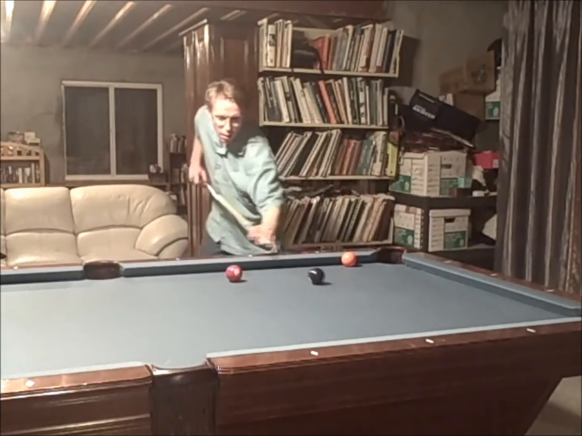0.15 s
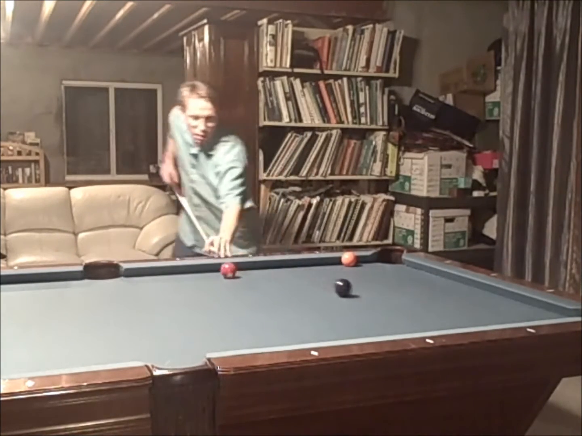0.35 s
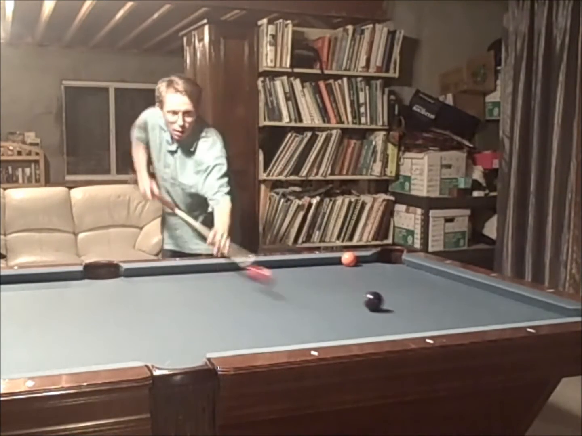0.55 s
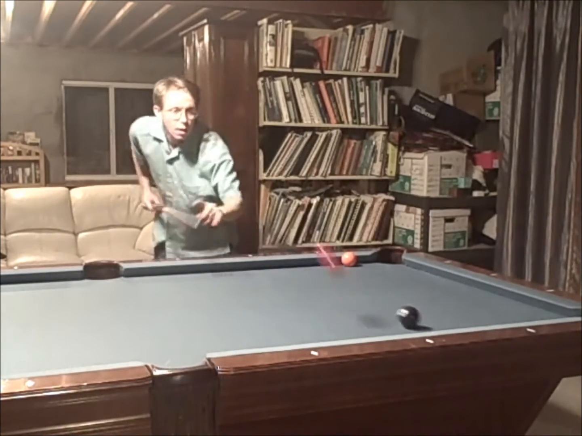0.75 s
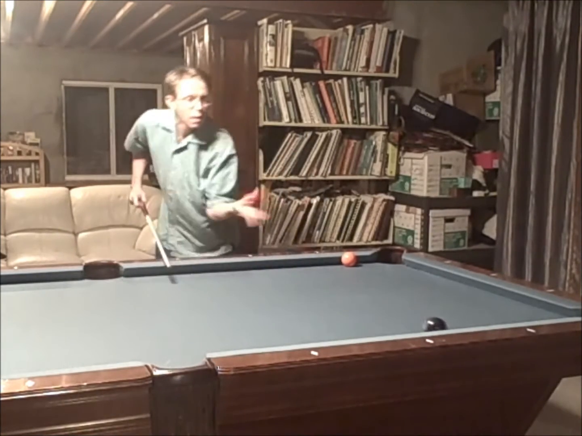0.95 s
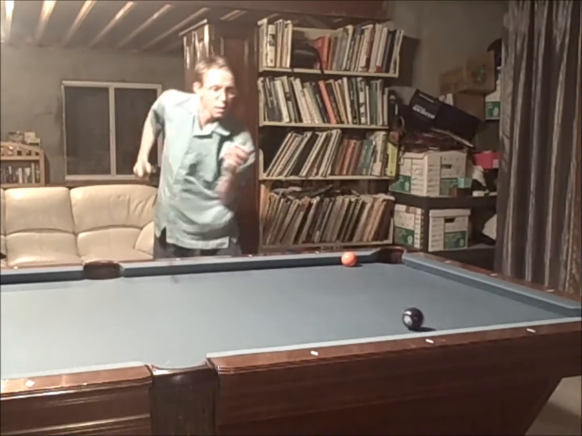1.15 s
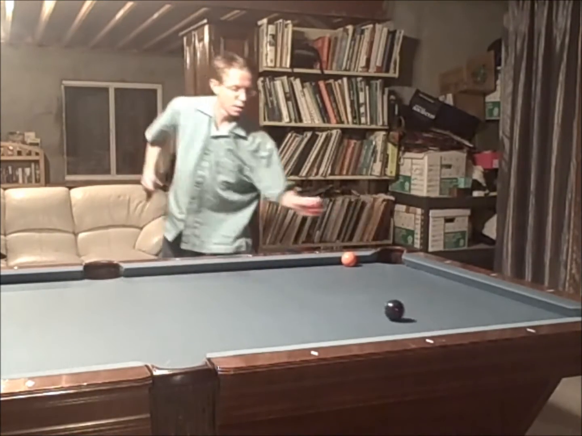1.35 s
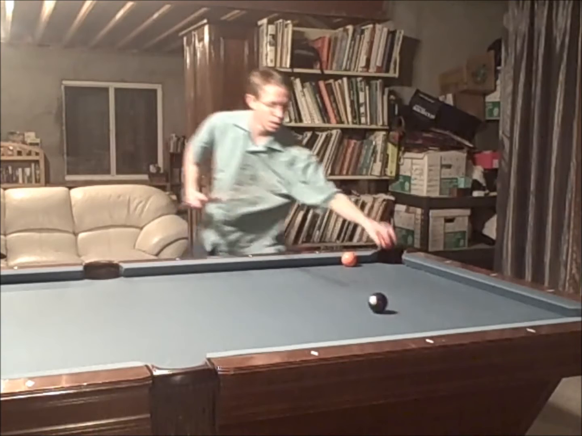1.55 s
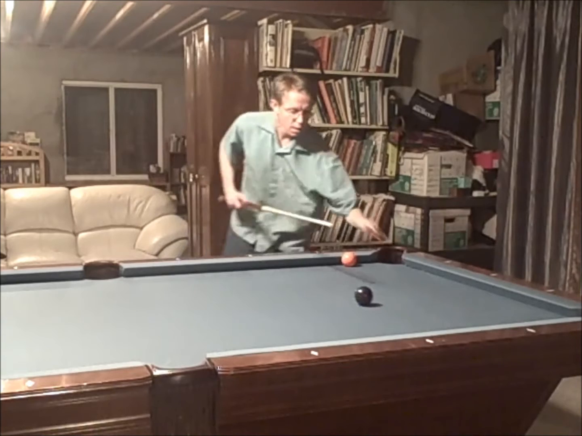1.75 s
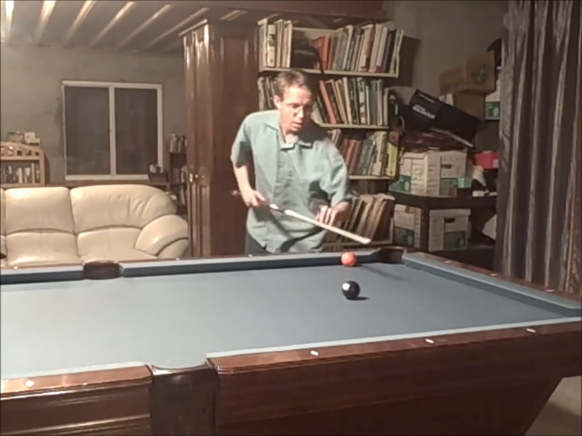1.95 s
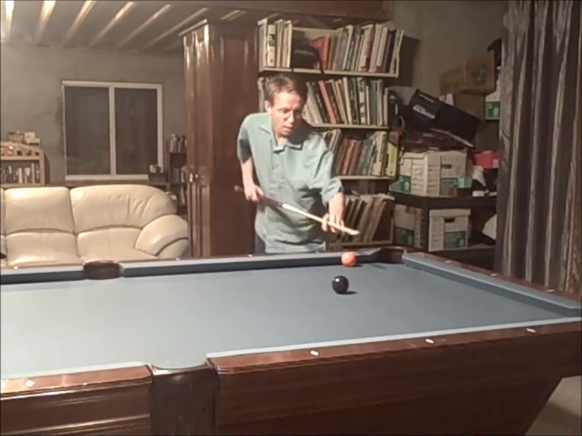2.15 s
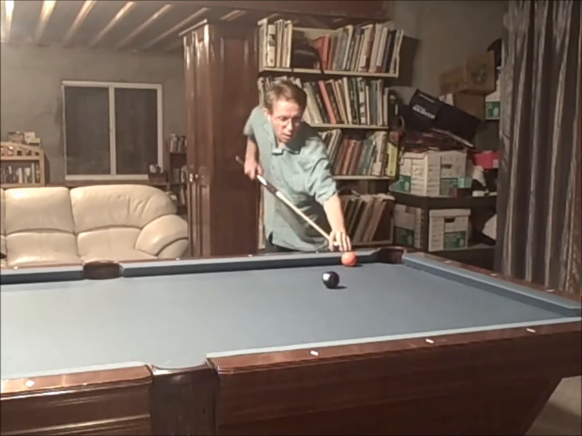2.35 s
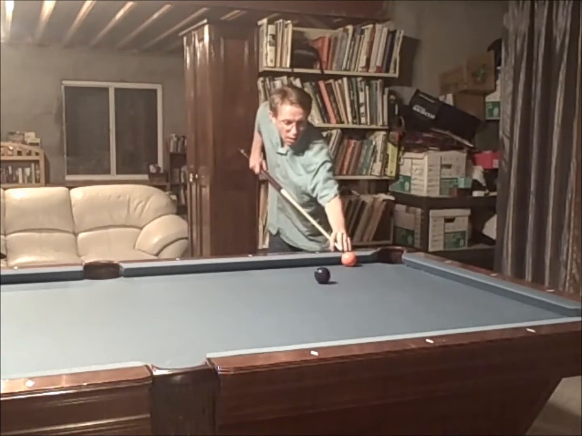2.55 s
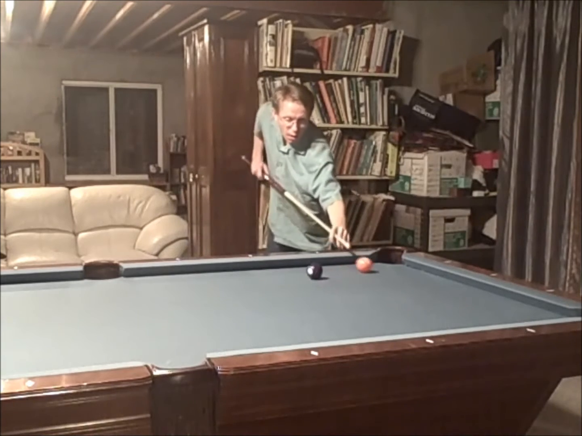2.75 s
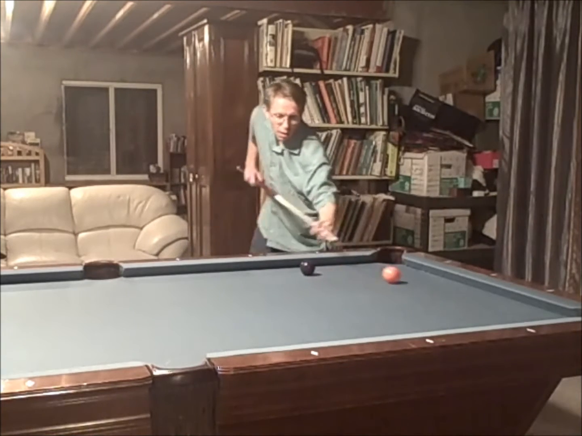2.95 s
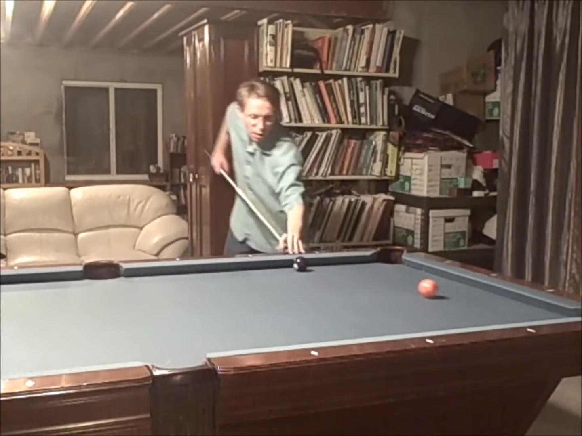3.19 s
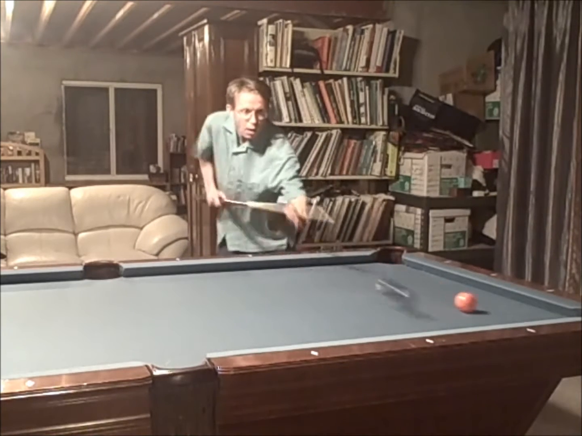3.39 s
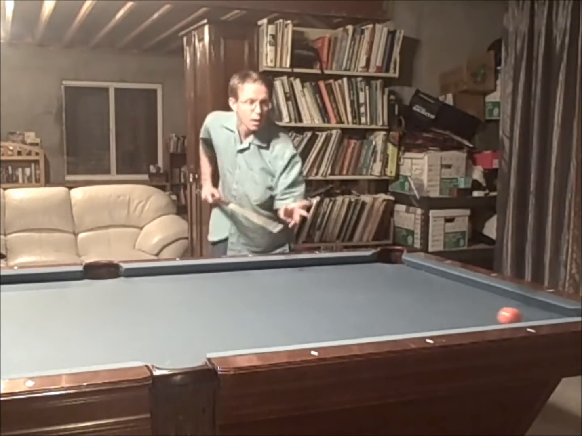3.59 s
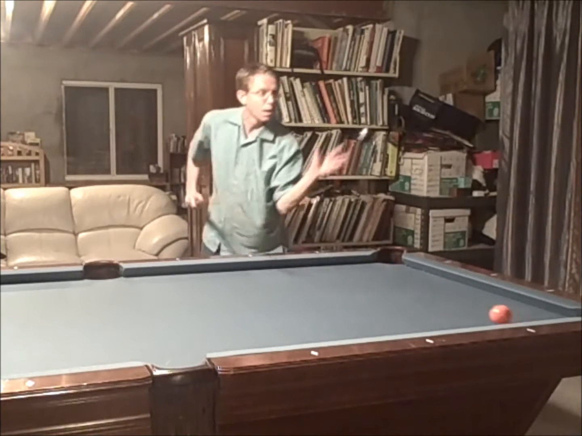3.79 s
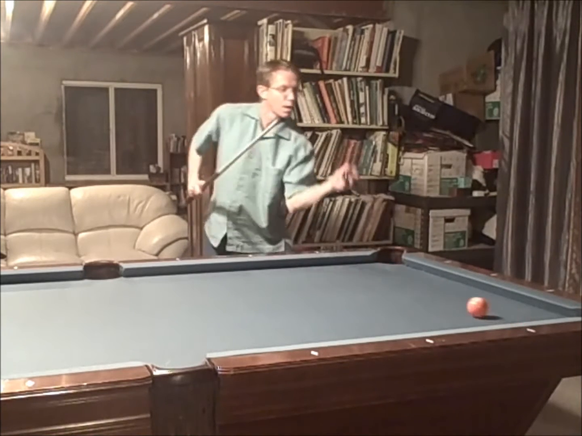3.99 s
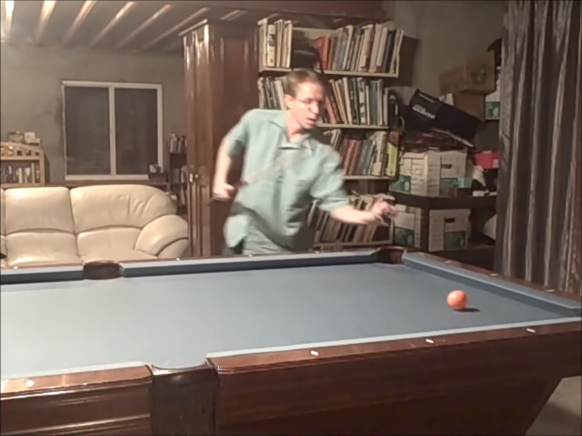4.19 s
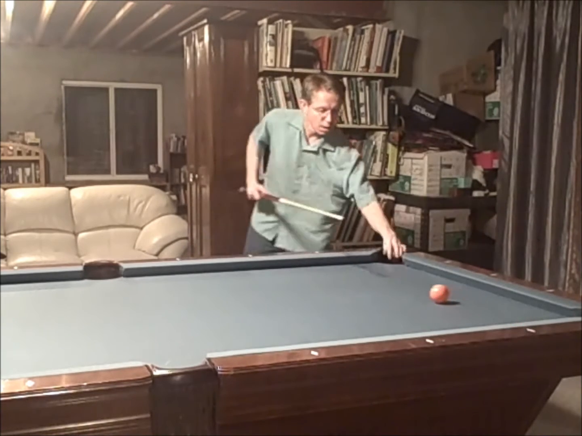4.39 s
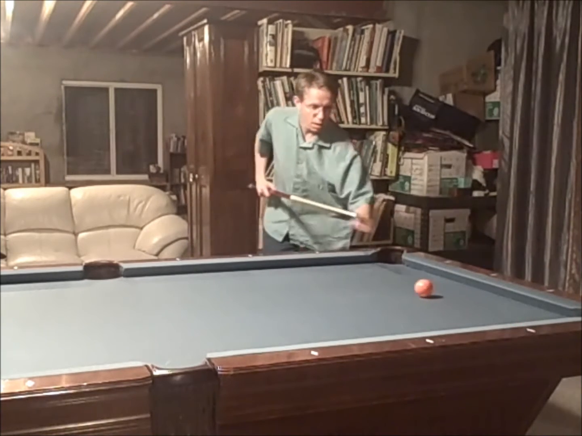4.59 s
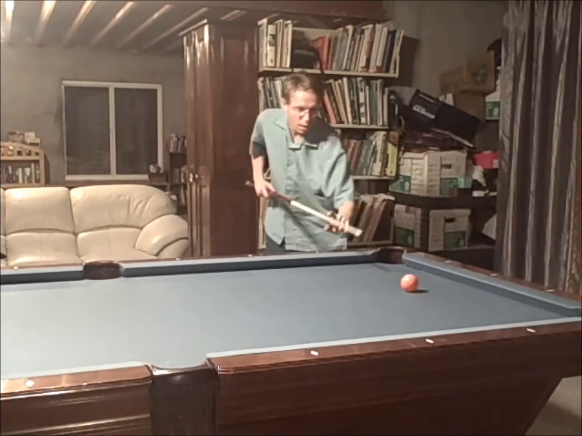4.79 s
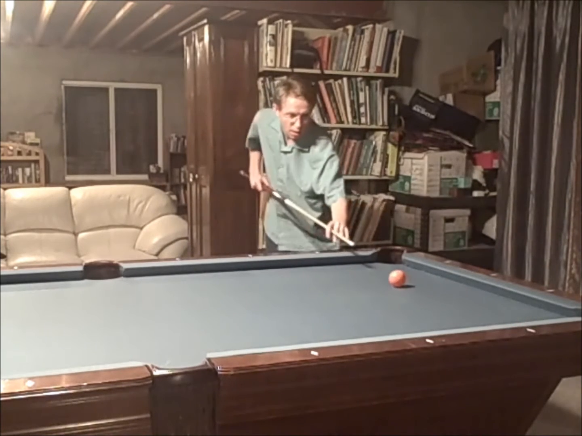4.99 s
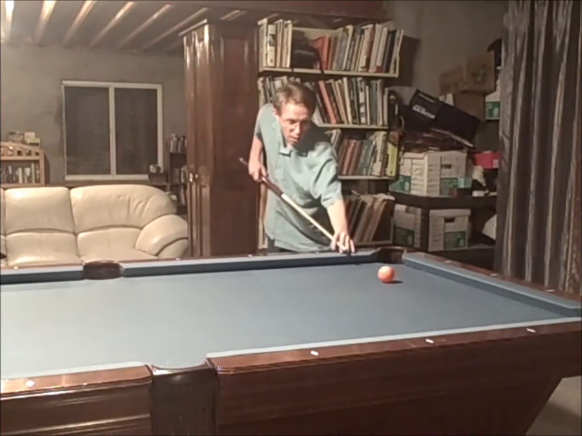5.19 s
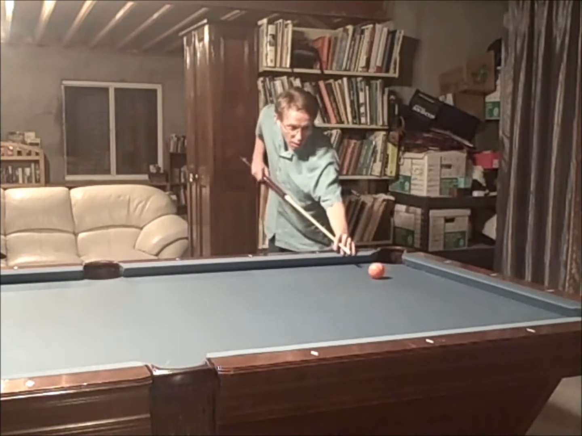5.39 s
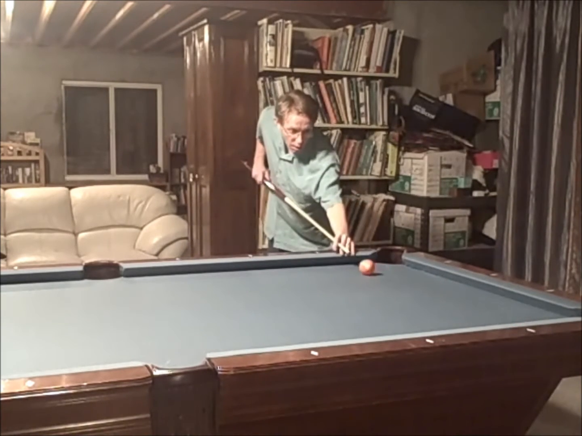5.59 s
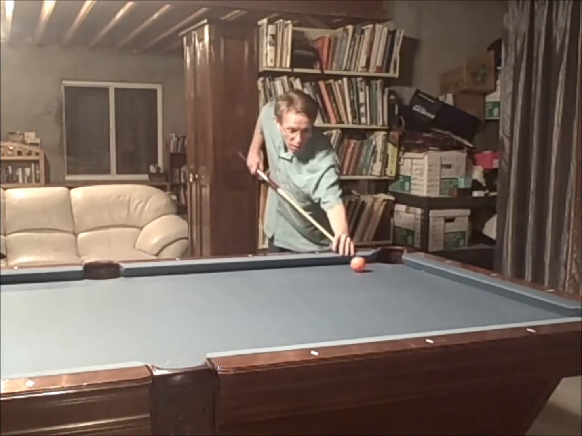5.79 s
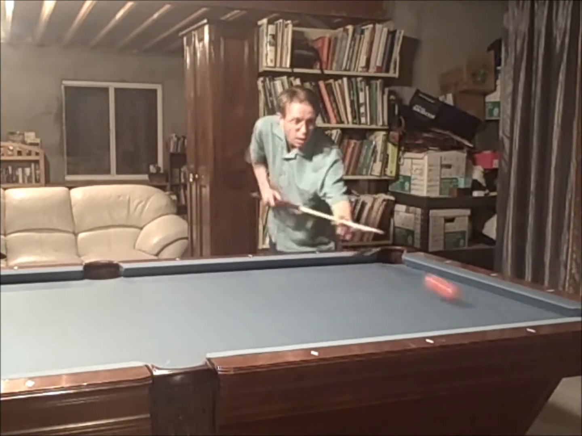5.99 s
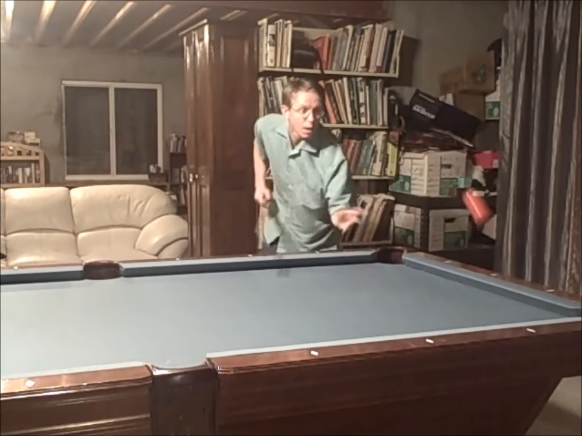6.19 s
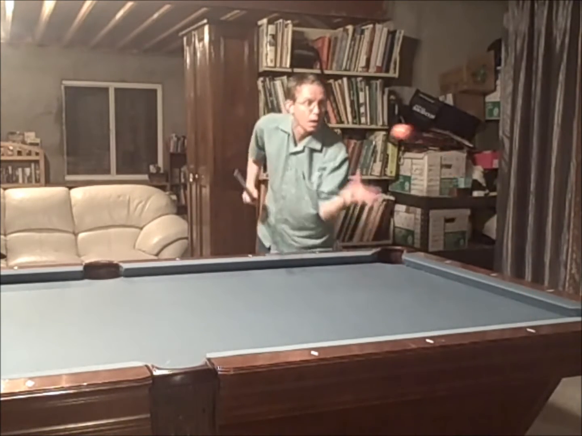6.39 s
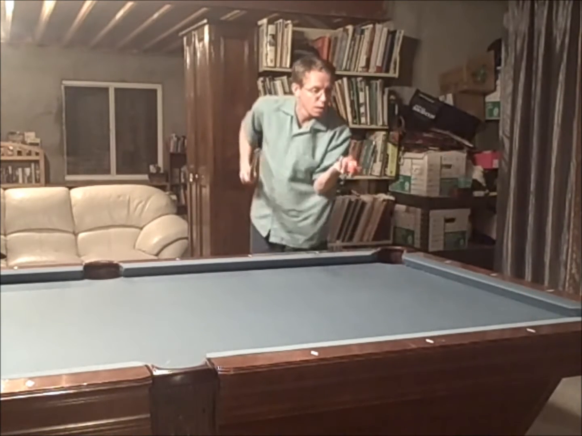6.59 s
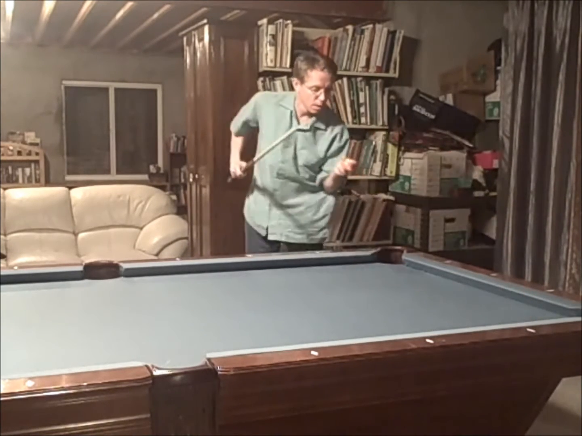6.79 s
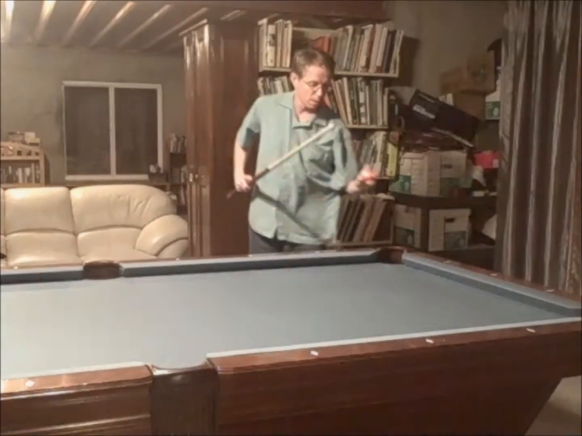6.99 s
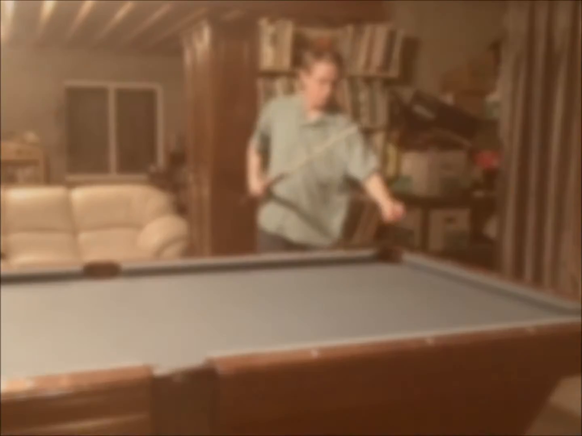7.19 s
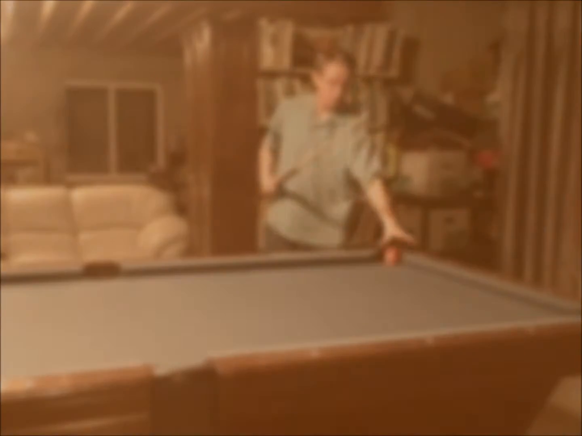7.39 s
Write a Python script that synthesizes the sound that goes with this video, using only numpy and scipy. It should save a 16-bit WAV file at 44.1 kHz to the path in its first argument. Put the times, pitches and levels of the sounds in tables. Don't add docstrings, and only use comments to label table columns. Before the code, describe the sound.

Three hard downward cue strikes crack loudly, each followed by a dull rail thud and hand catch; two pool balls clatter into a pocket.

```python
import sys
import numpy as np
from scipy import signal
from scipy.fft import rfft, irfft
from scipy.io import wavfile
from scipy.ndimage import uniform_filter1d

SR = 44100
rng = np.random.default_rng(int(sys.argv[2]) if len(sys.argv) > 2 else 0)


def magnitude_from_level(level_db):
    exponent = np.asarray(level_db, float) / 20
    return 10 ** exponent


def unload_audio(sound):
    columns = np.transpose(np.atleast_2d(sound))
    steps = np.round(np.clip(columns, -1, 1) * 32767)
    wavfile.write(sys.argv[1], SR, steps.astype(np.int16))


N = 328545

# start in seconds, level in dB, time for the rattle to fall 60 dB in seconds.
RAIL_HITS = [
    (0.839, -17.5, .15),
    (3.6079, -16.5, 0.16),
    (6.189, -18, 0.14),
]
# pitch in Hz, width in Hz, lift in dB.
FRAME_RINGS = [(172.8, 24, 8), (276.5, 10, 5.5), (409.4, 26, 4), (607, 60, 5), (732, 45, 1), (887, 28, 0.5)]
STROKE_RISE, SMALL_RISE = 0.025, 0.052


def jumps():
    # start in seconds, level in dB, rattle's 60 dB fall in seconds, rise as a share of that fall.
    strokes = [
        (.673, -7, .1, .012),
        (3.4237, -9, .06, .05),
        (6.032, -9.5, .062, .025),
    ]
    # frequency in Hz, level in dB.
    colours = [
        [(35, -73), (60, -40), (160, -10), (408, -3.5), (553, -5), (621, -1), (1170, -2.5), (1340, -6.5),
         (1510, -5.5), (2410, -7), (3670, -23), (4030, -21), (8710, -30), (12100, -29.5), (16000, -38.5)],
        [(12, -48.5), (20, -29.5), (70, -28), (262, -2), (499, -9), (590, -2), (678, -5.5), (897, 1),
         (2600, -9.5), (5850, -27.5), (6360, -22), (7310, -34), (7950, -27.5), (12100, -31), (16000, -36)],
        [(35, -52.5), (60, -29.5), (308, -6.5), (458, -12), (767, -3), (1090, -7), (1580, -9), (3420, -21.5),
         (4030, -24), (4970, -31.5), (5460, -26.5), (5860, -34), (11300, -34), (14200, -36), (16000, -41.5)],
    ]
    # pitch in Hz, width in Hz, lift in dB.
    shaft_rings = [(936.4, 23, 3.5), (1240, 44, 2.5), (1610, 50, 6.5)]
    # pitch in Hz, width in Hz.
    high_rings = [(4150, 87), (5450, 210), (6480, 110), (8200, 130), (9350, 120), (11200, 200),
                  (12000, 300), (13050, 200)]
    high_lifts = [
        [5, 7, 8, 9, 7, 4, 13, 6],
        [6, 9, 8, 10, 8, 5, 12, 8],
        [6, 7, 7, 10, 8, 9, 11, 6],
    ]
    contact_db, room_db = -22, -3.5
    out = np.zeros(N)
    for (start, db, t60, rise), colour, lifts in zip(strokes, colours, high_lifts):
        bright = [(hz, width, lift) for (hz, width), lift in zip(high_rings, lifts)]
        row = (start, db, t60, contact_db, room_db)
        add(out, start, hit(row, colour, FRAME_RINGS + shaft_rings + bright, rise))
    return out


def thump():
    jolt = (3.426, -36, 40, .05)
    start, db, hz, t60 = jolt
    t = np.arange(SR // 2) / SR
    out = np.zeros(N)
    add(out, start, magnitude_from_level(db - 60 * t / t60) * np.sin(2 * np.pi * hz * t))
    return out


def rail_thuds():
    # frequency in Hz, level in dB.
    colours = [
        [(59, -36.5), (100, -10), (177, 0.5), (471, -7), (547, -5.5), (784, -5.5), (891, -8), (1200, -6),
         (1610, -14.5), (2220, -18), (3940, -38.5), (6560, -51), (16000, -57)],
        [(59, -30), (100, -16), (170, -2), (492, -8.5), (583, -6), (691, -4), (891, -5), (1450, -5.5),
         (2990, -23.5), (3700, -34.5), (4870, -43), (6700, -49), (16000, -54)],
        [(59, -55.5), (100, -22), (150, 0.5), (224, -7.5), (277, 1), (461, -14.5), (595, -6), (950, -4.5),
         (1280, -7), (1550, -11), (2580, -21.5), (3400, -40), (16000, -68)],
    ]
    contact_db, room_db = -16.5, -0.95
    rows = [(*row, contact_db, room_db) for row in RAIL_HITS]
    return play(rows, colours, FRAME_RINGS, 0.0097)


def taps():
    # start in seconds, level in dB, rattle's 60 dB fall in seconds.
    soft_strokes = [
        (.0665, -29, .082),
        (2.807, -27, .11),
    ]
    # frequency in Hz, level in dB.
    colours = [
        [(88, -32.5), (150, -11.5), (275, 0.5), (525, -12), (611, -4), (685, -14.5), (893, -10), (1910, -22),
         (2350, -31.5), (2790, -33), (14000, -55.5)],
        [(88, -31.5), (150, -8), (577, -4), (647, -12.5), (782, -3.5), (1000, -8), (1640, -14.5), (2350, -28),
         (2540, -28), (3850, -36.5), (14000, -51)],
    ]
    contact_db, room_db = -9.5, 0.079
    rows = [(*row, contact_db, room_db) for row in soft_strokes]
    return play(rows, colours, FRAME_RINGS, STROKE_RISE)


def catches():
    # start in seconds, level in dB, rattle's 60 dB fall in seconds, contact in dB, room tail in dB.
    touches = [
        (1.1705, -39, .019, 2.1, -16),
        (1.1728, -29, 0.047, -2, -1.4),
        (4.0748, -47.5, .012, -13, -3),
        (4.0822, -38.5, 0.07, 0, -1.2),
        (6.739, -44.5, .054, -2, 1.8),
    ]
    # frequency in Hz, level in dB.
    colours = [
        [(240, -42), (400, -14.5), (789, -19.5), (1030, -15), (1220, -16), (1330, -13.5), (2670, -4.5),
         (3210, -5.5), (8900, -16.5), (13700, -10.5), (16000, -11)],
        [(290, -45), (500, -17), (698, -6), (1400, -9.5), (2360, -2.5), (2690, -4.5), (3440, -6), (4470, -14),
         (4800, -10.5), (8210, -6), (11100, -10.5), (12300, -5.5), (14900, -4), (16000, -6.5)],
        [(350, -48.5), (600, -27), (758, -5), (944, -19), (1510, -4.5), (1640, -15), (1750, -5), (2570, -0.5),
         (4340, -17), (4780, -8), (8740, -13.5), (10900, -25), (13200, -4.5), (16000, -18)],
    ]
    # pitch in Hz, width in Hz, lift in dB.
    palm_rings = [(2670, 260, 5.5)]
    first, second, third = colours
    cupped = play(touches[:2], [first, first], palm_rings, SMALL_RISE)
    return cupped + play(touches[2:], [second, second, third], [], SMALL_RISE)


def pocket_drops():
    # start in seconds, level in dB, rattle's 60 dB fall in seconds, contact in dB, room tail in dB.
    knocks = [(1.830, -28.5, 0.088, 10.5, 7.5), (1.884, -38, .067, -4, -12), (1.902, -40.5, 0.11, -23, 3),
              (1.945, -39.5, 0.031, -16, 4), (1.99, -48, 0.83, -25, 10), (4.609, -29, 0.049, -8, -7),
              (4.628, -33.5, 0.044, 1, 2), (4.68, -44.5, 0.63, -23, 1), (4.745, -47, 0.092, -9, .6),
              (4.964, -54.5, 0.078, -1, 1), (5.10, -59, 0.079, -18, 4)]
    # frequency in Hz, level in dB.
    colours = [
        [(88, -31.5), (150, -3), (422, -20), (716, -12), (854, -14), (1630, -3), (1870, -1.5), (2270, 3.5),
         (3700, -9), (4950, -32.5), (14500, -38), (16000, -40)],
        [(88, -39), (150, -11), (231, -3), (398, -16), (578, -3), (979, -8), (1450, -1), (3100, -7),
         (4410, -26), (6910, -33), (15100, -37), (16000, -41)],
        [(88, -45), (150, -12), (589, -10), (979, -4), (1140, -4), (1420, 1.5), (1760, -1), (2650, 1),
         (3220, -1), (4490, -27.5), (13200, -33.5), (16000, -35)],
        [(88, -32), (150, -7), (198, -2), (257, 0), (442, -18.5), (670, -6.5), (1320, -9.5), (2100, -5),
         (6000, -48), (7800, -59), (13200, -120)],
        [(180, -32.5), (300, -11), (636, 3), (893, -1), (1690, -0.5), (4550, -26), (6000, -27), (7800, -62),
         (13200, -120)],
    ]
    # pitch in Hz, width in Hz, lift in dB.
    gully_rings = [(592, 12, 8)]
    clack, tumble, late_clack, gully, far = colours
    order = [clack] + 4 * [tumble] + 2 * [late_clack] + 2 * [gully] + 2 * [far]
    return play(knocks, order, gully_rings, SMALL_RISE)


def ticks():
    # start in seconds, level in dB, centre in Hz, rattle's 60 dB fall in seconds, room tail in dB.
    rattles = [
        (.861, -49, 6700, 0.015, 1),
        (1.876, -49.5, 6950, 0.12, 13),
        (3.638, -51.5, 5005, .03, -6),
        (6.192, -56.5, 12060, 0.035, -6.5),
        (6.215, -65.5, 12030, .02, -5),
        (6.262, -59, 6020, .023, -4),
    ]
    # frequency as a share of the centre, level in dB.
    shape = [(.45, -30.5), (.75, -4.5), (0.999, 1.5), (1.252, -9.5), (1.6, -12), (3, -12)]
    rows = [(start, db, t60, 3.5 - 110 * t60, room_db) for start, db, _, t60, room_db in rattles]
    colours = [[(centre * share, level) for share, level in shape] for _, _, centre, _, _ in rattles]
    return play(rows, colours, [], SMALL_RISE)


def play(rows, colours, rings, rise_share):
    out = np.zeros(N)
    for row, colour in zip(rows, colours):
        add(out, row[0], hit(row, colour, rings, rise_share))
    return out


def hit(row, colour, rings, rise_share):
    # delay in seconds, level in dB.
    echoes = [(.0034, -11), (.0062, -13), (.0093, -10), (0.015, -14.5), (.019, -13.5), (.026, -14)]
    _, db, t60, contact_db, room_db = row
    t = np.arange(SR) / SR
    rise = t60 * (rise_share + 0.04 * t60)
    grain = magnitude_from_level(1.7 * evened(uniform_filter1d(rng.standard_normal(SR), 90)))
    rattle = grain * rng.standard_normal(SR) * magnitude_from_level(-60 * t / t60)
    rattle *= 1 - np.exp(-(t / rise) ** 2)
    drive = rattle / np.linalg.norm(rattle) + magnitude_from_level(room_db) * room_tail()
    for delay, echo_db in [(0.0015, 0.0036)] + echoes:
        add(drive, delay, magnitude_from_level([contact_db + echo_db]))
    sound = signal.fftconvolve(drive, body_response(colour, rings))
    return magnitude_from_level(db) * sound / np.sqrt(np.mean(sound[:SR // 40] ** 2))


def body_response(colour, rings):
    hz = abs(np.fft.fftfreq(16384, 1 / SR))
    log_gain = np.log(magnitude_from_level(read(colour, hz) + peaks_db(rings, hz)))
    phase = -signal.hilbert(log_gain).imag
    return np.fft.ifft(np.exp(log_gain + 1j * phase)).real[:8192]


def peaks_db(rings, hz):
    return sum(db / (1 + (2 * (hz - f) / width) ** 2) for f, width, db in rings)


def room_tail():
    # frequency in Hz, time to fall 60 dB in seconds.
    room_decay = [(100, 0.42), (330, 0.45), (870, .38), (2300, 0.32), (6000, 0.29), (15000, 0.19)]
    hz, t, z = signal.stft(rng.standard_normal(SR), SR, nperseg=256)
    f, t60 = np.transpose(room_decay)
    fall_db = -60 * t / np.interp(np.log(hz + 1), np.log(f), t60)[:, None]
    far_end = magnitude_from_level(-22.5 + fall_db / 2.5)
    out = signal.istft(z * (magnitude_from_level(fall_db) + far_end), SR, nperseg=256)[1][:SR]
    out *= 1 - np.exp(-np.arange(SR) / SR / 0.004)
    return 1.03 * out / np.linalg.norm(out)


def slides():
    # peak in seconds, level in dB, rise in seconds, fall in seconds.
    strokes = [(.42, -62.5, 0.074, 0.11), (.6, -63, .06, 0.058), (.665, -60.5, 0.034, 0.011),
               (1.79, -71, .04, .04), (2.125, -69, .035, 0.054), (2.31, -71, .08, 0.1),
               (2.43, -69, .1, 0.092), (3.245, -66.5, .06, 0.067), (3.41, -62.5, .045, 0.011),
               (3.75, -70.5, 0.076, .04), (3.8, -67, 0.022, .11), (4.57, -67, 0.075, .07),
               (4.73, -64.5, .09, 0.14), (5.2, -73, .07, .06), (6.418, -65, 0.053, .045)]
    # frequency in Hz, level in dB.
    colour = [(600, -18), (1500, 1), (3000, 0), (6000, -3.5), (11000, -11), (16000, -9)]
    level = uniform_filter1d(swells(strokes, 2), 800)
    grain = magnitude_from_level(1.2 * evened(uniform_filter1d(rng.standard_normal(N), 150)))
    return magnitude_from_level(3.5) * level * grain * noise(lambda hz: read(colour, hz))


def rolling():
    # peak in seconds, level in dB, rise in seconds, fall in seconds.
    passes = [
        (.66, -60.5, 1.56, 2.4),
        (1.7, -68, 1.9, 2.4),
        (3.4, -66, 1.3, 1.85),
        (4.0, -67, 1.6, 0.47),
        (4.9, -67.5, 1.2, 1.5),
        (6.6, -65.5, 2.5, 1.1),
    ]
    # pitch in Hz, width in Hz, level in dB.
    hums = [(265, 110, 1.5), (597.6, 23, 2), (1189, 92, -5.5), (900, 1400, -10)]

    def colour_db(hz):
        power = sum(magnitude_from_level(2 * db) / (1 + (2 * (hz - f) / width) ** 2) ** 1.3 for f, width, db in hums)
        return 10 * np.log10(power)

    rest_db = -78.5
    return magnitude_from_level(-5) * (swells(passes) + magnitude_from_level(rest_db)) * noise(colour_db)


def furnace_rumble():
    # frequency in Hz, level in dB.
    colour = [(8.8, -59.5), (15, -24.5), (32, -12.5), (86, 0.5), (107, 2.5), (140, -4), (237, -19),
              (327, -27.5), (373, -34.5), (395, -24), (500, -30), (650, -66), (1100, -120)]
    delay, shake_db, rise, fall = 0.06, -2.5, 0.12, 0.13
    shudder = swells([(row[0] + delay, shake_db, rise, fall) for row in RAIL_HITS])
    return magnitude_from_level(-49) * (1 + shudder) * noise(lambda hz: read(colour, hz))


def microphone_hiss():
    # frequency in Hz, level in dB.
    colour = [(180, -29.5), (300, -1), (373, -15), (717, -9), (780, -15.5), (1110, -14.5), (2740, -20.5),
              (14900, -27), (16500, -42)]
    return magnitude_from_level(-66) * noise(lambda hz: read(colour, hz))


def swells(rows, roundness=1):
    t = np.arange(N) / SR
    level = 0
    for peak, db, rise, fall in rows:
        distance = np.maximum((peak - t) / rise, (t - peak) / fall)
        level = level + magnitude_from_level(db - 20 * distance ** roundness)
    return level


def noise(db_of_hz):
    hz = np.fft.rfftfreq(N, 1 / SR)
    return evened(irfft(rfft(rng.standard_normal(N)) * magnitude_from_level(db_of_hz(hz)), N))


def evened(x):
    return x / np.sqrt(np.mean(x ** 2) + 1e-20)


def read(points, hz):
    f, value = np.transpose(points)
    return np.interp(np.log(hz + 1), np.log(f + 1), value, value[0] - 20, value[-1] - 10)


def add(mix, start, sound):
    part = mix[round(start * SR):][:len(sound)]
    part += sound[:len(part)]


def scene():
    hits = jumps() + thump() + rail_thuds() + taps() + catches() + pocket_drops() + ticks()
    background = furnace_rumble() + microphone_hiss()
    return (hits + slides() + rolling() + background)[None]


def roll_off(x):
    return signal.sosfilt(signal.butter(12, 16750, fs=SR, output="sos"), x)


def record(dry):
    fizz = magnitude_from_level(-49) * dry ** 2 * rng.standard_normal(dry.shape)
    clipped = np.clip(dry + fizz, -0.98, 0.98)
    treble_cut = signal.firwin(127, 16550, fs=SR)
    mix = signal.oaconvolve(clipped, treble_cut[None], "same")
    return roll_off(mix)


dry = scene()
out = record(dry)
unload_audio(out)
```